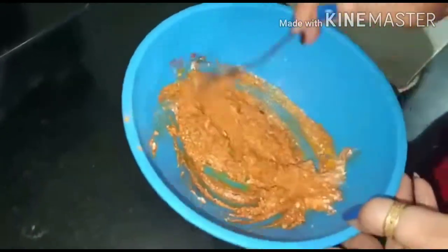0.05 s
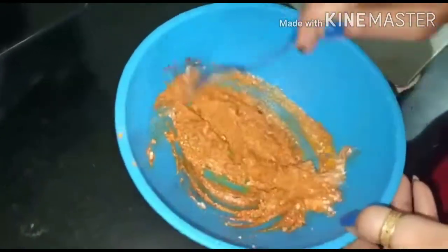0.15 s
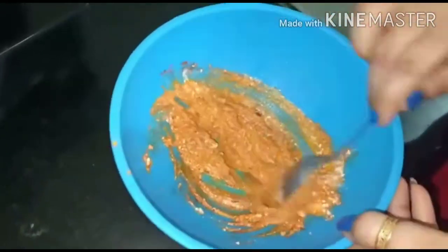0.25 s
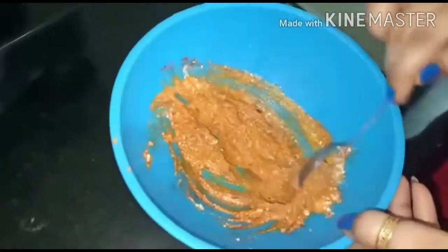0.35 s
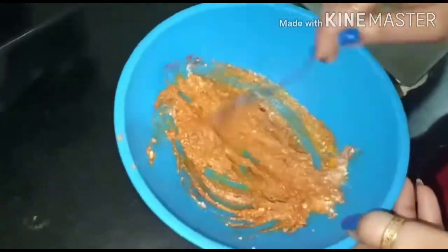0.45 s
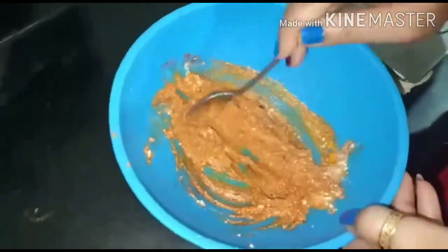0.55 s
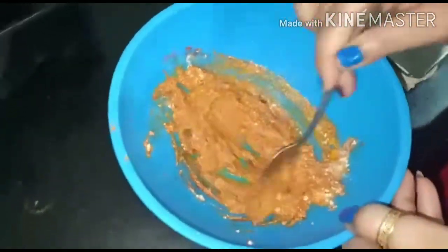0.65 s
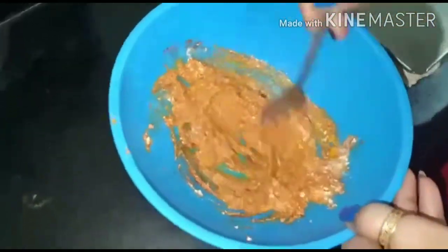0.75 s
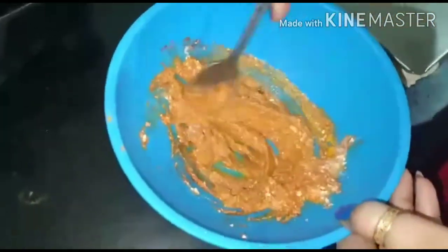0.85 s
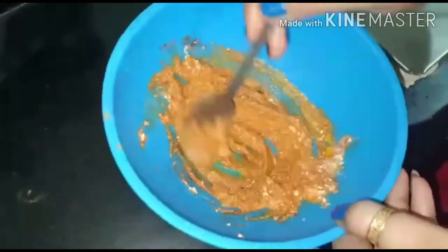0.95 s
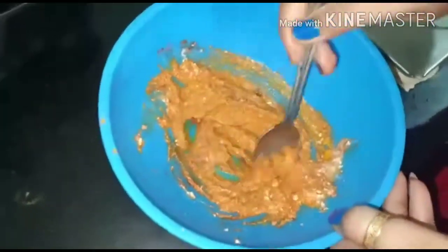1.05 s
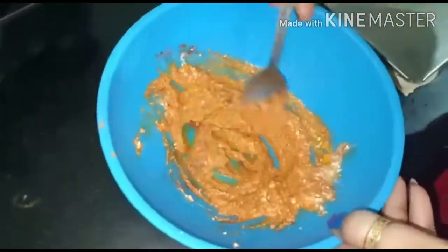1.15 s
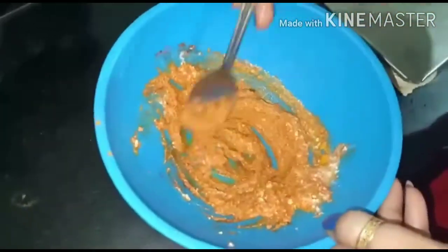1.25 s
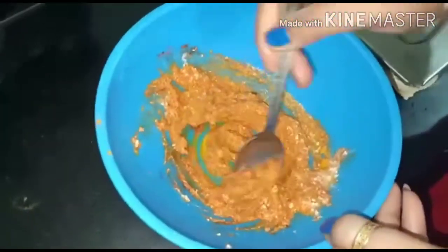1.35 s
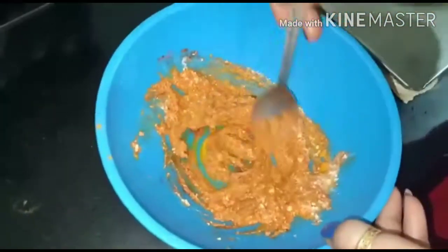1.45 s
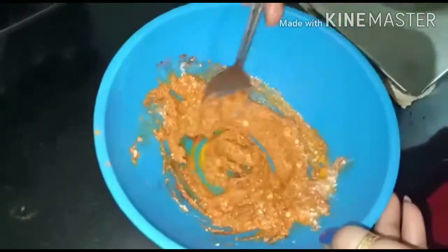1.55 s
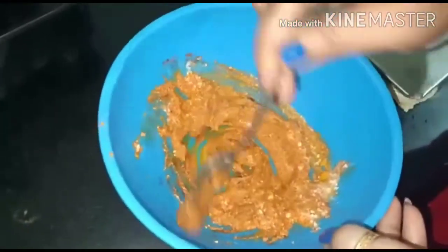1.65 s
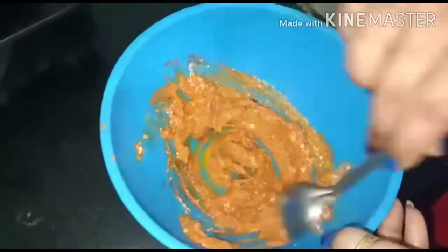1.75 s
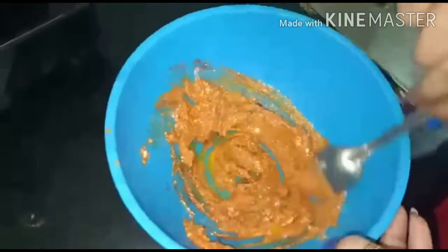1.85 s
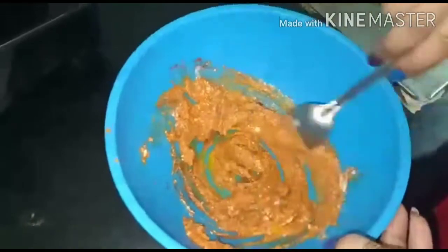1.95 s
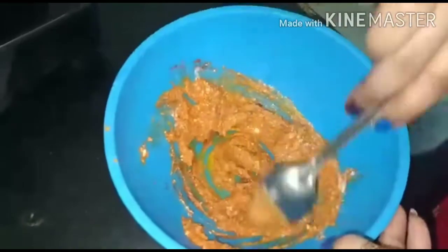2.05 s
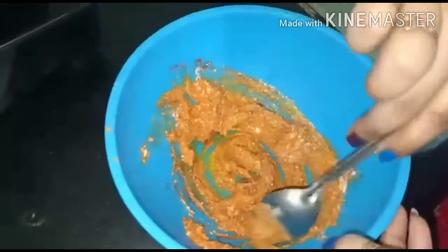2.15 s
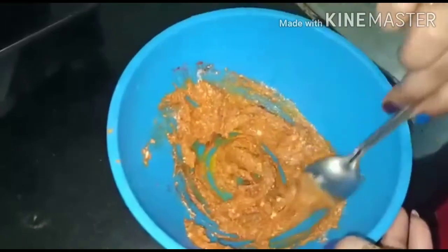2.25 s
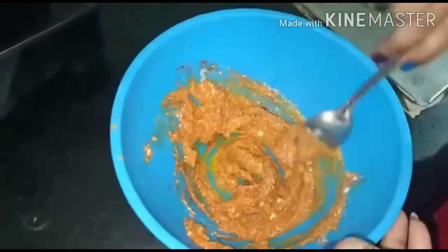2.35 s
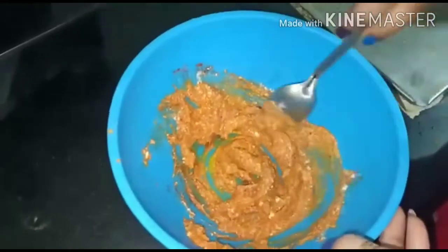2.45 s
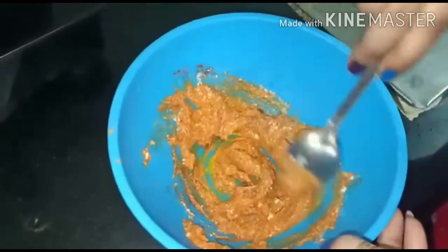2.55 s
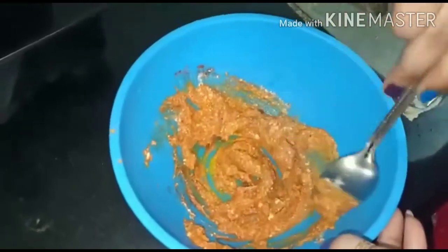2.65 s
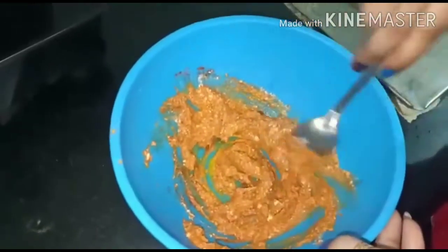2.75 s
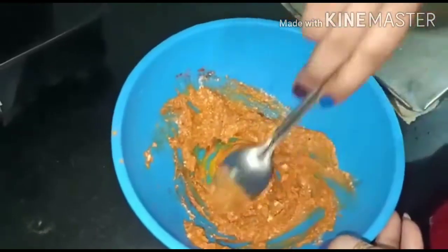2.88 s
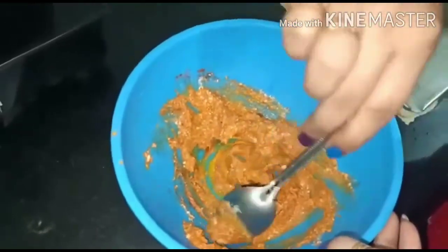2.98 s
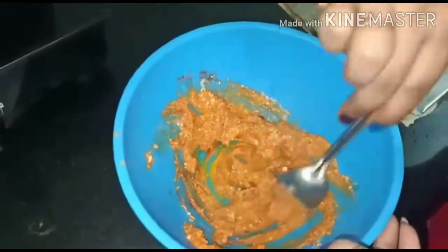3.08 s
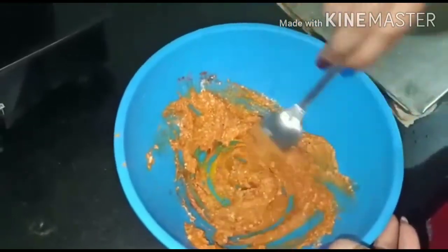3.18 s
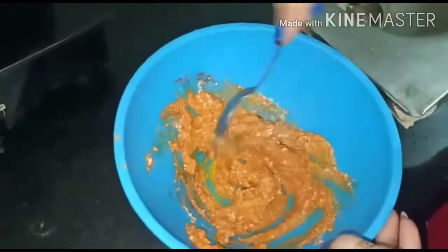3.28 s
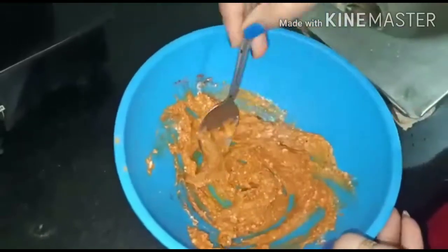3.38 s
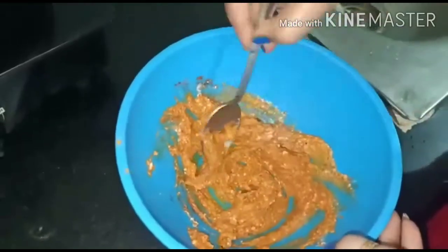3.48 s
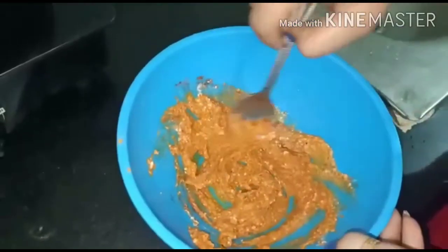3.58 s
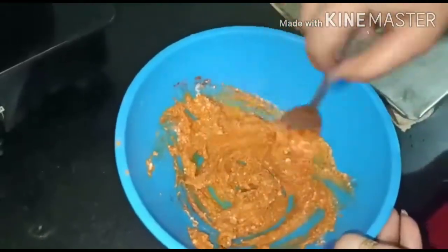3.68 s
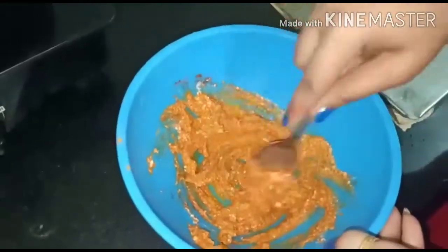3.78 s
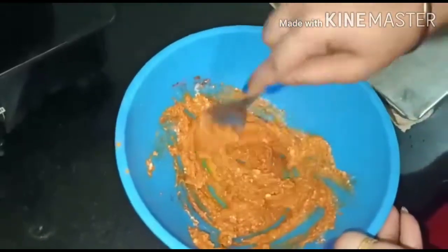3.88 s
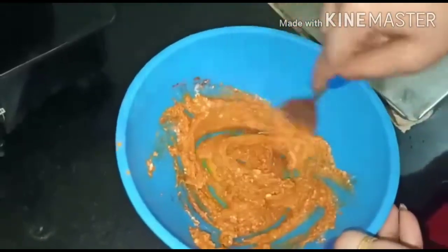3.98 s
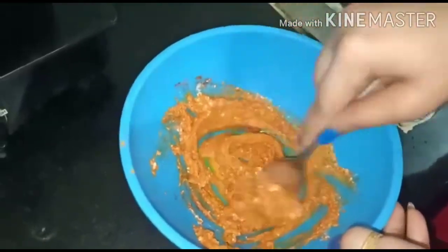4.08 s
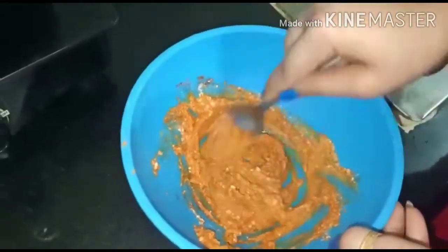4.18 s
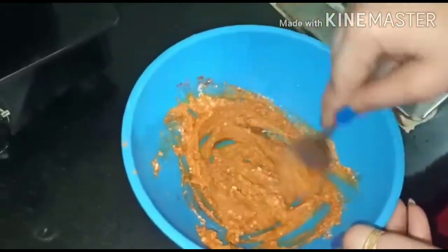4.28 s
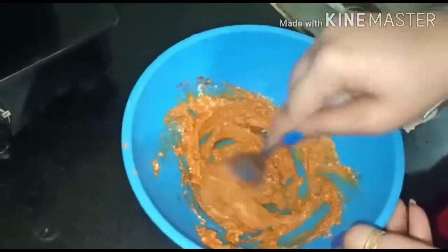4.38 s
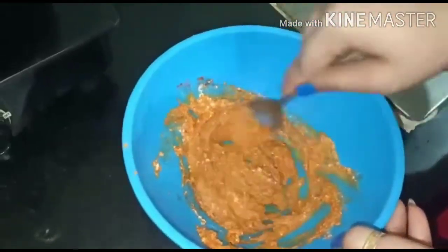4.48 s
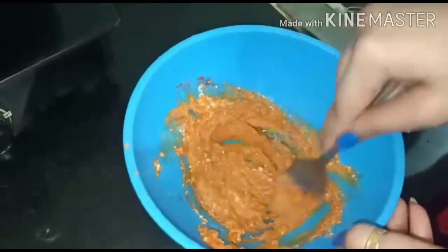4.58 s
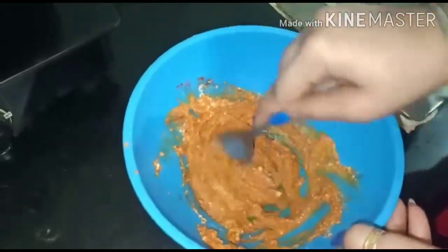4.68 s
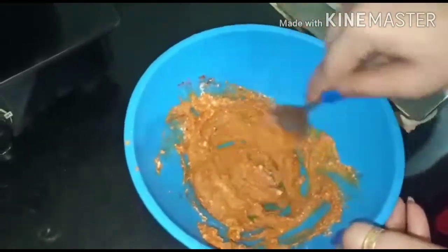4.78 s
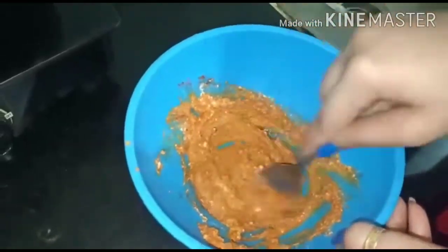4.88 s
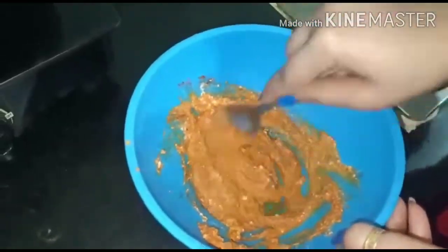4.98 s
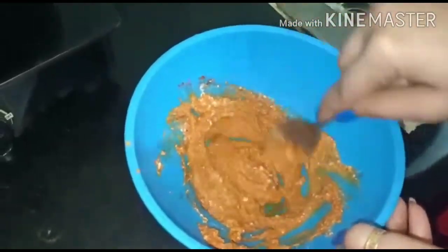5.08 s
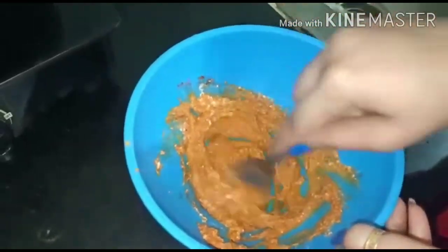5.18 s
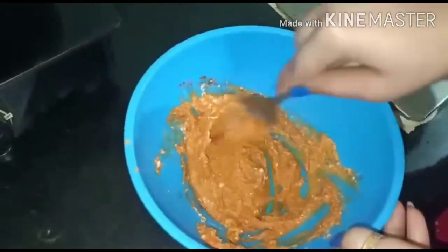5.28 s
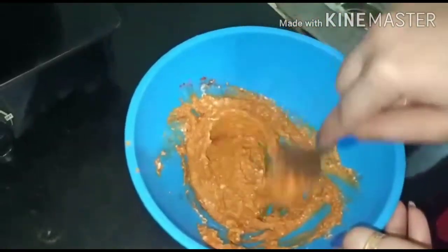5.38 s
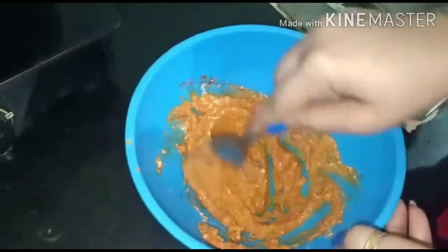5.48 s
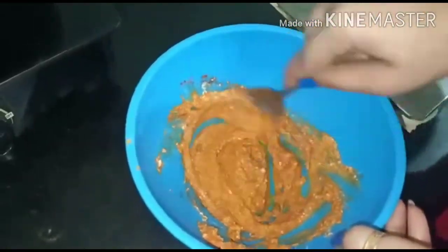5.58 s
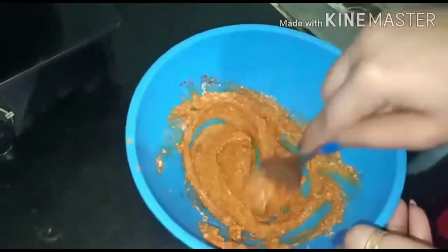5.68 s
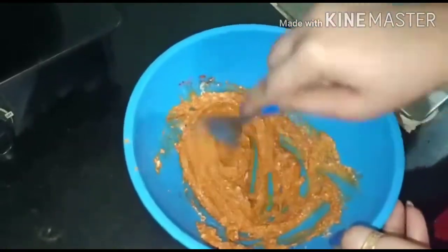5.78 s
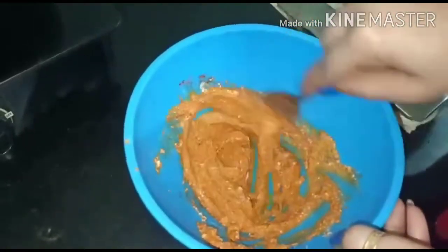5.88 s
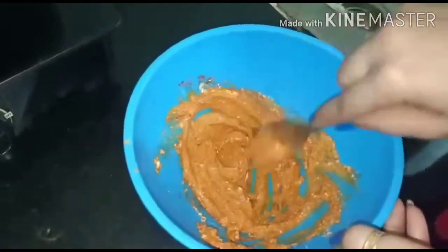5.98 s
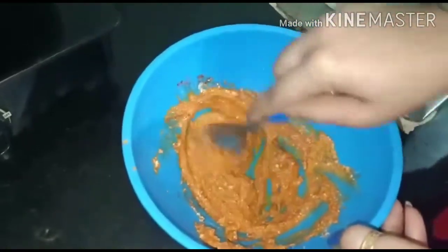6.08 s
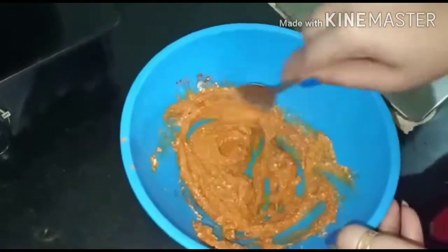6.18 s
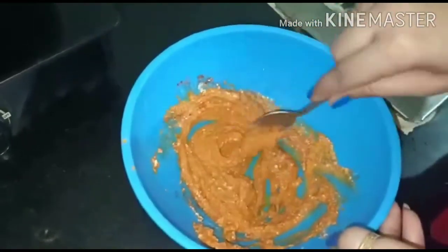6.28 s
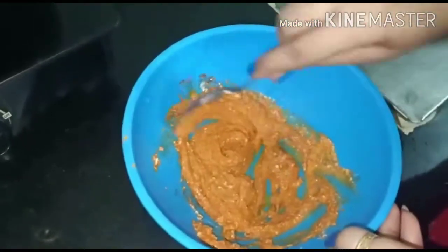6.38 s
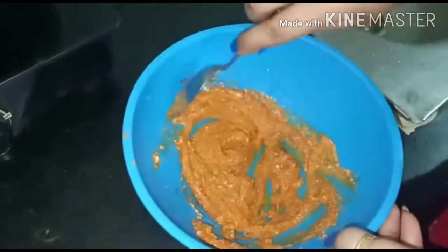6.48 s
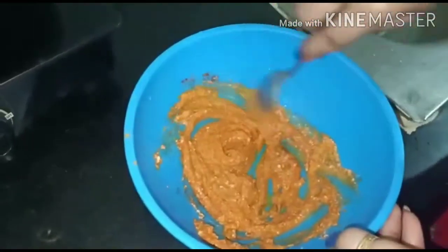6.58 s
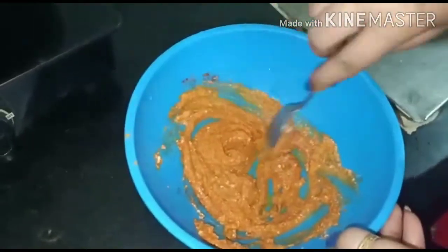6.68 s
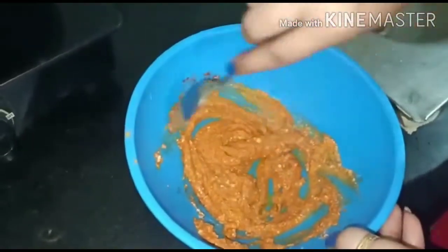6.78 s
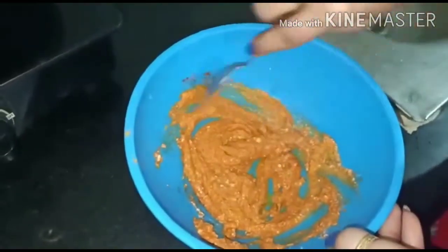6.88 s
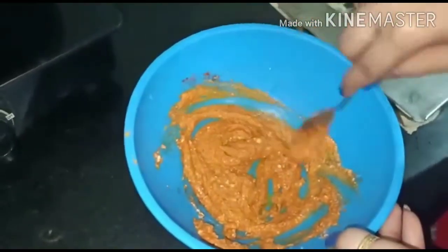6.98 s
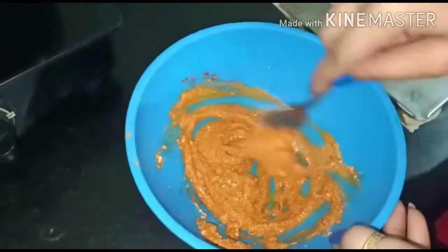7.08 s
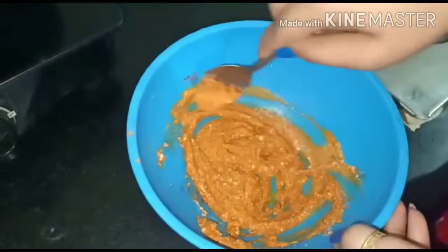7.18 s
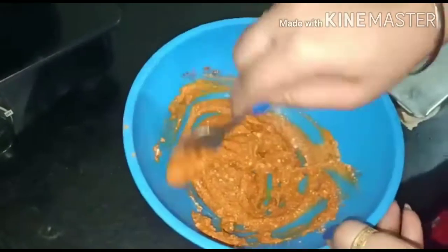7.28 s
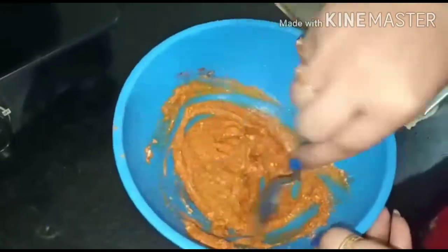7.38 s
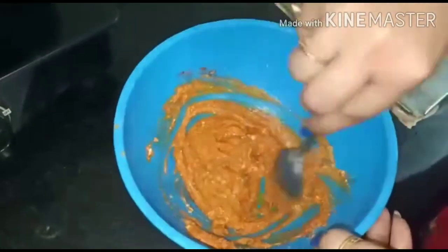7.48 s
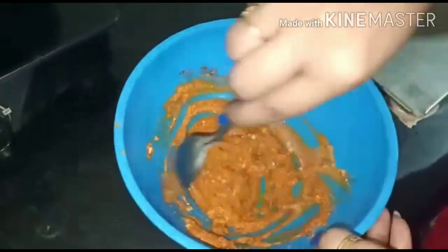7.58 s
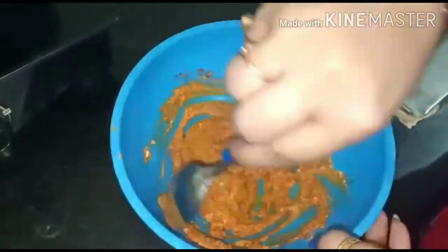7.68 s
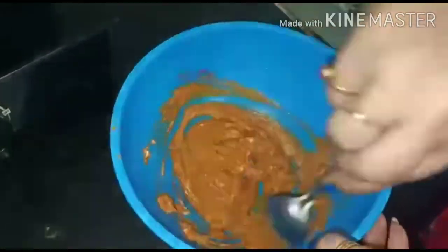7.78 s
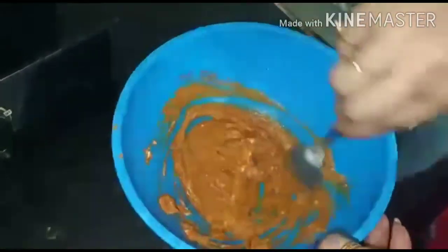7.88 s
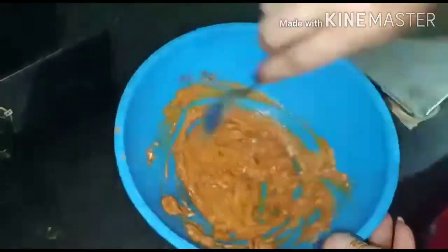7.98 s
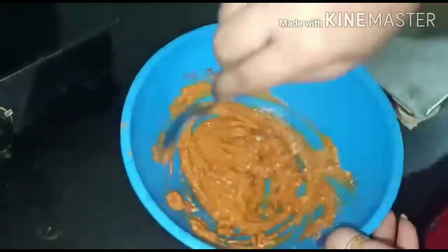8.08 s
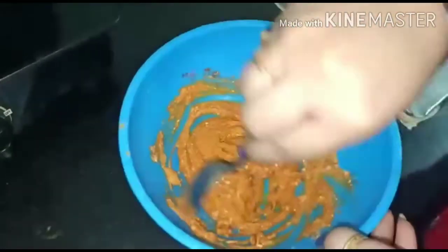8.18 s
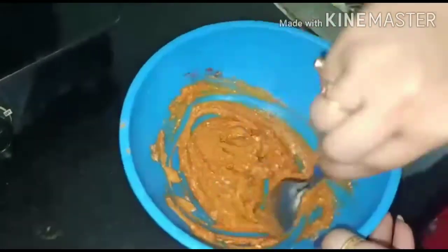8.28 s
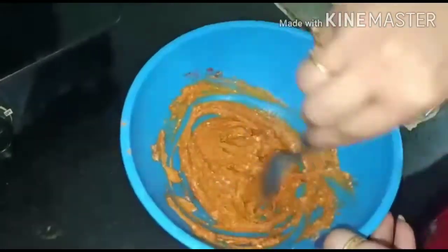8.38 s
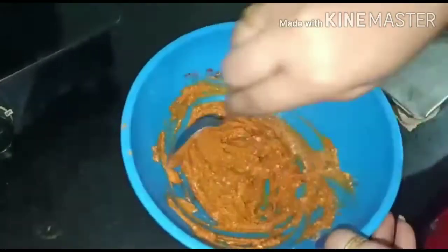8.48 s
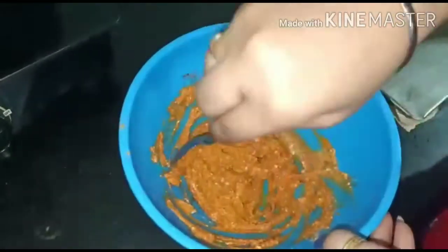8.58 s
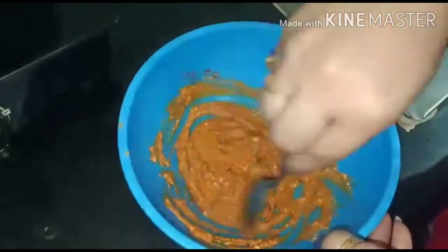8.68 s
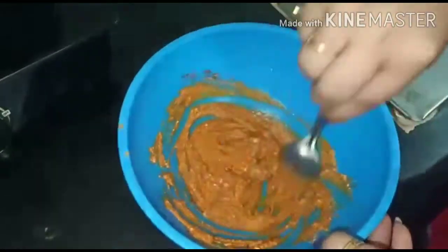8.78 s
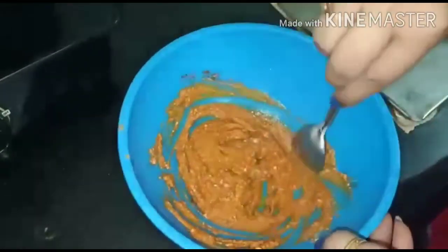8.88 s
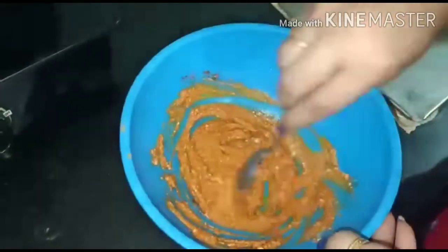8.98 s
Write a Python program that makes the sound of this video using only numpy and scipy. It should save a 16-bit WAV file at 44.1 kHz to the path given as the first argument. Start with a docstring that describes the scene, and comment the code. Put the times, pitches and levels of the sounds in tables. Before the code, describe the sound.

Close, dry plastic knocks from a metal spoon alternate with short gritty scrapes and small wet squelches. The strokes are irregular and brisk, busiest in the middle where the spoon circles without lifting. A bright scrape and snap follow just before seven seconds, then slower separate taps. Short kitchen reflections and a faint low room hush surround the bowl; the microphone is near and slightly dull in the highest treble.

```python
"""In a small hard-walled kitchen, a steel spoon beats a thick, gritty marinade in a hand-held plastic bowl.
Knocks ring damped bowl modes; tiny random slips ring the same modes as the spoon drags and scrapes.
The paste crackles, squelches and pops as its air pockets tear; a faint squeak sounds between two knocks.
The middle part is one continuous stir. Two microphone ports listen from close above,
over reflections, low standing waves and a quiet room floor made from shaped noise and decaying tones."""
import sys
import numpy as np
from scipy import signal
from scipy.io import wavfile

SR = 44100
rng = np.random.default_rng(int(sys.argv[2]) if len(sys.argv) > 2 else 0)


def wav_out(sig):
    """Save sig, one row per channel (or a flat mono array), as 16-bit PCM at SR to the path in sys.argv[1]."""
    wavfile.write(sys.argv[1], SR, np.round(np.clip(np.atleast_2d(sig).T, -1, 1) * 32767).astype(np.int16))


N = 398663

# All table levels are relative: the mix settings of each source come on top.
# spoon knocks, by what they set ringing: (time [s], hollow pitch [Hz], clack pitch [Hz],
# wall flex [dB], hollow [dB], clack [dB], tick [dB])
KNOCKS = [(.074, 583, 2400, -24.5, -13, -15.5, -31), (.299, 826, 1790, -26, -12.5, -13.5, -29),
          (0.3095, 826, 2300, -47, -36, -17.5, -34.5), (.534, 704, 2220, -27.5, -12.5, -18, -29.5),
          (0.7574, 713, 1460, -35, -21.5, -43, -46), (.8586, 684, 1860, -23.5, -10.5, -19, -37),
          (.976, 786, 2900, -55.5, -36, -29.5, -40), (.998, 807, 2600, -50.5, -31, -25, -49),
          (1.117, 892, 1900, -59, -35, -25, -47.5), (1.153, 914, 2300, -56.5, -22.5, -36, -39),
          (1.171, 850, 2550, -46.5, -34, -25, -47), (1.202, 617, 1690, -26, -11, -24.5, -34),
          (1.304, 746, 2600, -49, -26, -38, -63), (1.335, 806, 2650, -60, -22.5, -33, -63),
          (1.544, 560, 1480, -24.5, -20, -26, -40), (1.734, 744, 2600, -41.5, -23.5, -39, -59),
          (1.963, 723, 2910, -25.5, -13, -15, -27.5), (2.1823, 770, 2190, -35.5, -26, -19.5, -48),
          (2.198, 800, 1900, -53, -41.5, -35, -52), (2.26, 630, 2280, -38.5, -51.5, -37.5, -57),
          (2.514, 603, 2560, -31.5, -16.5, -19.5, -26), (2.631, 764, 2550, -41, -47, -29.5, -56),
          (2.655, 764, 1750, -40.5, -25.5, -31, -60), (2.842, 690, 2600, -23, -14.5, -24, -33),
          (2.919, 755, 2400, -34.5, -21.5, -41.5, -40), (2.9965, 807, 2700, -53.5, -24, -30, -45.5),
          (3.2643, 658, 2000, -22, -12.5, -11.5, -17), (3.599, 711, 2420, -37, -30, -36, -50),
          (3.621, 684, 1600, -42, -42, -27, -54), (3.698, 800, 2000, -40, -22, -33, -40),
          (3.739, 764, 2500, -36.5, -23, -22.5, -46), (3.867, 717, 2600, -59, -26, -22.5, -39),
          (3.906, 713, 2400, -53, -22.5, -21.5, -34), (3.914, 820, 2600, -58, -25, -21, -38),
          (3.947, 724, 2580, -34, -17, -17, -30), (4.031, 735, 2600, -48, -22, -24.5, -41),
          (4.041, 752, 2400, -60, -23, -23.5, -46), (4.149, 983, 2600, -50, -27, -40, -56),
          (4.174, 720, 2550, -31.5, -19, -36.5, -34.5), (4.231, 797, 2680, -34, -22, -25, -40),
          (4.401, 906, 2300, -62, -27.5, -36, -54), (4.454, 740, 2520, -30, -12, -16.5, -29.5),
          (4.515, 740, 2300, -40.5, -31, -29, -39), (4.557, 740, 1970, -43, -20, -44, -62),
          (4.735, 803, 2340, -35.5, -18, -21, -50), (4.845, 720, 2540, -37, -23.5, -28.5, -41),
          (5.029, 693, 2360, -36, -20, -34, -44), (5.086, 776, 2700, -36.5, -22.5, -26.5, -45),
          (5.186, 765, 1990, -47.5, -37.5, -29.5, -49.5), (5.215, 780, 2390, -54, -19.5, -32.5, -46.5),
          (5.267, 900, 2210, -52, -23, -29.5, -29), (5.274, 890, 2600, -58, -28, -28, -30),
          (5.296, 730, 2150, -30, -9.5, -14, -37), (5.383, 767, 2800, -47, -21.5, -26, -48),
          (5.398, 713, 2400, -32, -29, -33.5, -54), (5.49, 969, 2600, -57, -32, -19, -38),
          (5.602, 914, 1500, -33.5, -21, -30, -33), (5.66, 608, 2180, -41, -32, -55, -57),
          (5.788, 975, 1790, -34, -20.5, -20, -38), (5.855, 1000, 2450, -51, -23.5, -25.5, -39),
          (5.945, 848, 2420, -36, -25, -20, -32.5), (6.289, 723, 2590, -32, -22.5, -21, -33.5),
          (6.4695, 837, 1700, -46, -26, -30.5, -46), (6.475, 820, 1600, -56, -32, -30.5, -51),
          (6.657, 710, 2600, -28.5, -18.5, -14.5, -30.5), (6.802, 854, 2930, -60, -15, -18.5, -41),
          (6.826, 663, 2860, -54, -22, -17.5, -32), (7.078, 620, 2930, -25.5, -21, -18, -42),
          (7.533, 755, 2720, -31, -23, -20, -32.5), (7.989, 728, 2680, -35, -40, -28, -36),
          (8.151, 761, 2750, -66, -42, -37, -44), (8.411, 540, 2760, -21.5, -17.5, -20, -30),
          (8.528, 740, 2750, -58, -33.5, -24, -29.5), (8.889, 825, 1900, -31, -19.5, -24, -48),
          (8.9475, 854, 2200, -42, -26, -29, -45), (8.986, 770, 2820, -40, -46, -28.5, -46)]
# modes of the paste-damped bowl with the spoon against it: (frequency [Hz], level [dB], t60 [s])
BOWL = [(214, -8.5, 0.046), (264, -6, 0.048), (306.6, 0.5, 0.028), (364, 0, 0.028), (450, -4, 0.024),
        (546, -1, 0.028), (602, 1.5, 0.015), (703, -1, 0.024), (740, 0.5, 0.032), (826, -3.5, 0.023),
        (928, -0.5, 0.028), (1090, -3, 0.0089), (1326, 0, 0.0094), (1600, 2, 0.0075), (1768, -0.5, 0.0048),
        (1900, -4.5, 0.012), (2162, -4, 0.0076), (2401, -5, 0.026), (2600, 0.5, 0.014), (2930, 1, 0.0095),
        (3380, -2.5, 0.011), (3800, -5, 0.0088), (4200.4, 7.5, 0.004), (4700, 4, 0.0048),
        (5200, -6, 0.0021), (6040, 2.5, 0.0063), (6760, 2.5, 0.0095), (7000, 3, 0.0054)]
# edges of the four mode families flex, hollow, clack and tick: (frequency [Hz])
FAMILY_HZ = [150, 560, 1200, 4200, 9000]
# strokes of the spoon through the paste: (time [s], length [s], drag on the bottom [dB],
# scrape on the wall [dB], wet crackle [dB], wall pitch [Hz])
STROKES = [(0, 0.012, -37, -39.5, -56, 2600), (0.084, 0.021, -53, -29, -39, 2220),
           (0.521, 0.0083, -47, -27, -41, 2400), (0.632, 0.081, -39.5, -29, -41, 2370),
           (0.937, 0.095, -41.5, -36, -48, 2500), (1.064, 0.035, -45, -33.5, -47, 2490),
           (1.101, 0.054, -42, -29, -43.5, 2470), (1.297, 0.13, -43, -36.5, -51, 2470),
           (1.587, 0.043, -36, -34.5, -41, 2540), (1.694, 0.044, -34.5, -30, -42.5, 2700),
           (2.022, 0.19, -43, -39.5, -49, 2560), (2.17, 0.045, -41, -28, -48, 2470),
           (2.236, 0.014, -48, -37, -50, 2380), (2.559, 0.043, -43, -32.5, -47, 2480),
           (2.893, 0.11, -34.5, -31, -46.5, 2670), (3.288, 0.056, -30, -32.5, -46, 2400),
           (3.378, 0.11, -43, -41.5, -53.5, 2220), (3.598, 0.13, -39.5, -29, -41, 2350),
           (3.855, 0.078, -57, -42, -43, 2400), (4, 0.039, -38, -29, -41, 2403),
           (4.08, 0.062, -39.5, -36, -43.5, 2530), (4.186, 0.1, -37.5, -32, -44, 2600),
           (4.394, 0.028, -41, -30, -41.5, 2600), (4.465, 0.11, -40, -35, -47.5, 2350),
           (4.678, 0.073, -35, -30, -36.5, 2870), (4.785, 0.032, -39.5, -35.5, -41.5, 2600),
           (4.945, 0.032, -42, -35, -43, 2470), (4.979, 0.03, -32, -27, -35.5, 2470),
           (5.032, 0.11, -35, -31.5, -43, 2500), (5.229, 0.034, -38, -23, -45, 2280),
           (5.377, 0.05, -37, -31.5, -42.5, 2520), (5.523, 0.029, -33, -25, -31.5, 2300),
           (5.591, 0.082, -32, -36.5, -55, 2210), (5.678, 0.035, -56, -35, -41.5, 2360),
           (5.968, 0.06, -39.5, -35, -42.5, 2400), (6.404, 0.048, -54, -41.5, -50.5, 2750),
           (6.444, 0.017, -34, -28.5, -42.5, 2380), (6.727, 0.084, -40.5, -38, -42, 2820),
           (6.786, 0.042, -33, -21, -32, 2820), (7.103, 0.046, -52, -33.5, -43, 2640),
           (7.153, 0.037, -36, -25.5, -34, 2730), (7.194, 0.015, -30, -18.5, -29, 2670),
           (7.289, 0.048, -38, -34.5, -45.5, 2720), (7.614, 0.11, -56, -43.5, -49, 2680),
           (7.72, 0.032, -37, -32.5, -44.5, 2660), (7.983, 0.065, -38.5, -33, -43.5, 2760),
           (8.088, 0.093, -50.5, -41, -44.5, 2690), (8.489, 0.064, -35.5, -31, -35.5, 2780),
           (8.926, 0.076, -38, -34.5, -47, 2290)]
# the spoon circles without leaving the paste: (drag [dB], scrape [dB], crackle [dB])
CIRCLING_DB = [-44, -42.5, -52]
CIRCLING_FROM_S, CIRCLING_TO_S = 3.6, 5.75
# every stroke bites, swells and lets go; the crackle swells most, as the spoon pulls out of the paste:
# swell from start to end (drag [dB], scrape [dB], crackle [dB])
BITE_S, SWELL_DB, LET_GO_S = 0.0076, [-0.5, 0.5, 1.5], 0.013
# after each knock the spoon skids on and slows:
# (drag against hollow [dB], scrape against clack [dB], crackle against tick [dB])
SKID_DB, SKID_ONSET_S, SKID_FADE_S = [-19, -26, -15.5], 0.015, 0.069
# how bare of paste the wall is under the spoon; bare plastic rings more narrowly: (time [s], share [0-1])
BARE = [(0, 0.06), (2.2, 0.51), (2.8, 0.64), (3.5, 0.22), (5.8, 0.07), (6.72, 0.97), (8.6, 1), (8.8, 0.44)]
# air gaps that open or close under the spoon:
# (time [s], length [s], first pitch [Hz], last pitch [Hz], level [dB])
SQUELCHES = [(0.634, 0.11, 2050, 2000, -35), (0.643, 0.045, 3720, 3020, -39.5),
             (1.007, 0.088, 1520, 1320, -44), (1.103, 0.057, 810, 1040, -27),
             (1.316, 0.034, 1030, 1340, -45), (2.18, 0.042, 1860, 1570, -30.5),
             (2.183, 0.038, 3000, 2760, -30), (2.626, 0.047, 2600, 1900, -37.5),
             (2.884, 0.13, 5750, 6400, -33.5), (3.657, 0.076, 1730, 1220, -32.5),
             (3.858, 0.034, 2700, 4400, -33), (3.875, 0.064, 6800, 7400, -35.5),
             (4.03, 0.029, 3020, 3920, -41), (4.1, 0.052, 1370, 1050, -39), (4.131, 0.033, 3180, 3800, -35),
             (4.345, 0.046, 1900, 3940, -38.5), (4.64, 0.042, 2880, 3430, -32),
             (4.688, 0.022, 3500, 6340, -31), (4.784, 0.02, 3540, 3840, -34),
             (4.911, 0.077, 1290, 1600, -35.5), (4.97, 0.037, 7000, 5470, -32.5),
             (4.975, 0.11, 4700, 3060, -31.5), (5.243, 0.014, 7100, 6760, -29.5),
             (5.263, 0.011, 6500, 5200, -28.5), (5.533, 0.092, 4340, 3500, -33),
             (5.535, 0.072, 7000, 6150, -37), (5.63, 0.018, 1090, 706, -42),
             (5.652, 0.034, 620, 402, -31.5), (5.692, 0.039, 5330, 6330, -46),
             (6.8, 0.012, 2800, 3040, -10.5), (7.634, 0.076, 6900, 6440, -46),
             (7.149, 0.055, 2800, 3280, -29), (8.096, 0.11, 3270, 2600, -36),
             (8.503, 0.094, 3140, 2630, -29), (8.798, 0.11, 1750, 1600, -50),
             (8.815, 0.09, 1250, 1100, -48)]
# lone air pockets that burst in the paste: (time [s], pitch [Hz], level [dB])
POPS = [(.463, 6170, -30.5), (1.869, 6240, -42), (2.709, 6450, -24.5), (2.9725, 4960, -21),
        (2.985, 5800, -10.5), (4.429, 6500, -19), (6.119, 5970, -35.5), (7.172, 3500, -18),
        (7.712, 3550, -22), (8.507, 5500, -21), (8.872, 4800, -22.5)]
# loudness of the faint two-tone squeak: (time [s], level [dB])
SQUEAK = [(6.11, -88), (6.16, -55), (6.21, -59), (6.25, -95)]
# its two tones: (frequency [Hz], level [dB])
SQUEAK_LINES = [(517, 0), (1535, -5)]
# how much louder the left port hears each pitch of the bowl: (frequency [Hz], level difference [dB])
LEANING = [(200, -2.5), (350, 2.5), (430, -1), (530, 5.5), (610, 0.5), (740, 1), (826, -11.5), (933, 2),
           (1150, -5), (1500, -4.5), (2000, -0.5), (2700, -1), (4500, -5), (7000, -1)]
# low standing waves of the kitchen: (frequency [Hz], level [dB], t60 [s])
BOOM = [(78.6, -57.5, .6), (119, -60.5, 0.32), (140, -46, 0.43), (170, -52, 0.25), (200.6, -58, 0.3)]
# decay of the kitchen's reverberation: (frequency [Hz], t60 [s])
ROOM_T60 = [(100, 0.5), (260, 0.6), (700, 0.35), (1800, 0.36), (3000, 0.36), (6000, 0.28), (14000, 0)]
# its strength against the direct sound: (frequency [Hz], level [dB])
ROOM_DB = [(100, -10), (300, -1), (700, -1), (1500, -0.5), (3000, -3.5), (6000, -6.5), (14000, 10.5)]
# left-right likeness of diffuse sound: (frequency [Hz], correlation [-1 to 1])
LIKENESS = [(100, 0.75), (270, 1), (480, 0.35), (680, 0.83), (850, 0.27), (1200, -0.45), (1700, 0.05),
            (16000, 0.61)]
# spectrum of the quiet room: (frequency [Hz], density [dB per Hz])
FLOOR = [(25, -27.5), (50, -16.5), (75, -1), (140, -1), (300, -11), (700, -10.5), (1300, -14), (2700, -14),
         (5000, -24.5), (8000, -20.5), (16000, -27.5)]
FLOOR_DB = -62
CUTOFF_HZ = 15900


def knocks(thud_db=5.0, thump_db=20.5, thump_hz=300, flex_db=23.5, hollow_db=19.5, clack_db=21.5,
           tick_db=22.0, flex_hz=370, tick_hz=5000, focus_db=9.0, crack_db=23.5, crack_s=0.0015,
           snap_db=13.5, punch_db=16.0, contact_s=0.001205):
    """Steel on plastic rings four mode families, with a crack, a snap, a woody punch, a thump and a thud."""
    out = np.zeros((2, N + SR))
    t = np.arange(SR // 12) / SR
    push = thud()
    for s, hollow_hz, clack_hz, flex, hollow, clack, tick in KNOCKS:
        gains = from_db([flex + flex_db, hollow + hollow_db, clack + clack_db, tick + tick_db])
        pitches = [flex_hz, hollow_hz, clack_hz, tick_hz]
        hit = sum(gains[k] * bowl_ring(k, hz, focus_db) for k, hz in enumerate(pitches))
        crack = rng.standard_normal((2, len(t))) * np.exp(-t / crack_s)
        hit += from_db(tick + crack_db) * unit_energy(butter(crack, [2500, 6500], "band"))
        hit += from_db(hollow + punch_db) * punch(hollow_hz, cycles=0.96, lag_rad=.6)
        hit += from_db(clack + snap_db) * punch(clack_hz, cycles=0.89, lag_rad=1.14)
        hit += from_db(flex + thump_db) * punch(thump_hz, cycles=0.66, lag_rad=0.18)
        hit += from_db(flex + thud_db) * push
        start = int((s + contact_s) * SR)    # contact comes just after the listed time
        out[:, start:start + len(t)] += hit
    return out[:, :N]


def bowl_ring(family, focus_hz, focus_db, detune=0.028, spread_db=1.0, apart_hz=700, widest=1.59,
              phase_spread=0.44, build_cycles=0.76):
    """One contact rings a mode family; the spot favours modes near focus_hz and sets their port phases."""
    t = np.arange(SR // 12) / SR
    out = np.zeros((2, len(t)))
    for mode_hz, level_db, t60 in BOWL:
        if FAMILY_HZ[family] <= mode_hz < FAMILY_HZ[family + 1]:
            chance = rng.standard_normal((4, 1))
            hz = mode_hz * (1 + detune * rng.standard_normal())    # the shifting load of paste retunes it
            apart = min((hz / apart_hz) ** 2, widest) * (phase_spread * chance[1] - 1)
            phase = np.pi * chance[0] + apart * np.array([[.5], [-.5]])
            swell = 1 - np.exp(-t * hz / build_cycles)    # bending waves arrive later the lower they are
            strength_db = level_db - focus_db * abs(np.log2(hz / focus_hz)) + spread_db * chance[2:]
            decay = from_db(strength_db - 60 * t / t60)
            out += ports(at_hz(LEANING, mode_hz)) * decay * swell * np.sin(2 * np.pi * hz * t + phase)
    return unit_energy(butter(out, FAMILY_HZ[family] * 0.67, "high"))


def punch(hz, cycles, lag_rad, low_hz=180):
    """The wall dents and springs back in a few quick swings, which reach the left port a little later."""
    t = np.arange(SR // 12) / SR
    phase = lag_rad * np.array([[1], [0]])
    swing = t * np.exp(-t * hz / cycles) * np.sin(2 * np.pi * hz * t - phase)
    return unit_energy(butter(swing, low_hz, "high"))


def thud(low_hz=120, high_hz=200):
    """The whole bowl is pushed against the counter; both ports hear the same."""
    pulse = butter(signal.unit_impulse(SR // 12), [low_hz, high_hz], "band")
    return unit_energy(np.array([pulse, pulse]))


def stirring(thud_db=-26.5, flex_db=-17.0, drag_db=-2.0, scrape_db=-3.5, wet_db=-2.0, judder_db=3.2,
             lumps_db=0.98, flex_hz=400):
    """Catching on grains and lumps, the spoon judders in drag, scrape and crackle alike: (bowl, paste)."""
    t = np.arange(N) / SR
    judder = from_db(judder_db * drift(rate=200) + lumps_db * drift(rate=61))
    drag, scrape, wet = rubbing_forces() * judder

    dragging = drag * slips(per_s=1000, uneven_db=2.5)
    bottom = from_db(flex_db) * rubbed(dragging, family=0, focus_hz=flex_hz, focus_db=19.5)
    hollow_hz = np.interp(t, *np.transpose(KNOCKS)[:2])    # moves from one knock's spot to the next
    hollow = rubbed(dragging, family=1, focus_hz=hollow_hz, focus_db=6.0, wander=.3, scatter=.25)
    bottom += from_db(drag_db) * hollow

    scraping = from_db(scrape_db) * scrape * slips(per_s=1500, uneven_db=5.0)
    s, length, *_, wall_hz = np.transpose(STROKES)
    place_hz = np.interp(t, s + length / 2, wall_hz)    # travels from one stroke's spot to the next
    bare_share = np.interp(t, *np.transpose(BARE))
    on_plastic = rng.random(N) < bare_share    # each slip lands on bare wall or on paste
    wall = rubbed(scraping * on_plastic, family=2, focus_hz=place_hz, focus_db=25.0,
                  wander=0.048, scatter=0.073)
    wall += rubbed(scraping * ~on_plastic, family=2, focus_hz=place_hz, focus_db=12.5,
                   wander=0.45, scatter=.14)

    paste = from_db(wet_db) * crackle(wet * slips(per_s=2600, uneven_db=2.0))
    return from_db(thud_db) * through(dragging, thud()) + retuned(bottom + wall), paste


def rubbing_forces():
    """Strength of drag, scrape and crackle, from the strokes, the circling and the skid after each knock."""
    power = np.zeros((3, N))
    for s, length, drag, scrape, wet, _ in STROKES:
        add(power, s, [drag, scrape, wet], stroke(length, SWELL_DB))
    add(power, CIRCLING_FROM_S, CIRCLING_DB, stroke(CIRCLING_TO_S - CIRCLING_FROM_S, [0]))
    t = np.arange(SR // 2) / SR
    skid = np.minimum(t / SKID_ONSET_S, 1) * np.exp(-t / SKID_FADE_S)
    for s, *_, hollow, clack, tick in KNOCKS:
        add(power, s, np.add([hollow, clack, tick], SKID_DB), skid)
    return np.sqrt(power)


def stroke(length, swell_db):
    """Shape of the force in one stroke: bite, swell, release."""
    t = np.arange(int(length * SR) + SR // 4) / SR
    swell = from_db(np.outer(swell_db, np.minimum(t / length, 1) - .5))
    release = np.exp(-np.maximum(t - length, 0) / LET_GO_S)
    return np.minimum(t / BITE_S, 1) * swell * release


def add(power, s, levels_db, shape):
    """Lay one movement of the spoon into the powers of drag, scrape and crackle."""
    start = max(int(s * SR), 0)
    part = (from_db(levels_db)[:, None] * shape)[:, :N - start]
    power[:, start:start + part.shape[1]] += part ** 2


def slips(per_s, uneven_db):
    """Random tiny releases of force with uneven sizes; rms 1."""
    sizes = from_db(uneven_db * np.minimum(rng.exponential(1, N), 4)) * rng.choice([-1, 1], N)
    return rms_one(sizes * (rng.random(N) < per_s / SR))


def rubbed(force, family, focus_hz, focus_db, wander=.18, scatter=.15, count=6):
    """Slips ring one mode family from spots around the spoon's place (wander and scatter in octaves)."""
    spots = np.geomspace(FAMILY_HZ[family], FAMILY_HZ[family + 1], count)
    octave = np.log2(focus_hz / spots[0]) + wander * drift(rate=25) + scatter * rng.standard_normal(N)
    spot = np.clip(np.round(octave / np.log2(spots[1] / spots[0])), 0, count - 1)
    return sum(through(force * (spot == k), bowl_ring(family, hz, focus_db)) for k, hz in enumerate(spots))


def retuned(x, shift_s=0.0022):
    """Paste and spoon load the wall differently from moment to moment, so its resonances slide a little."""
    samples = np.arange(N)
    read_at = samples + shift_s * SR * drift(rate=12)
    return np.array([np.interp(read_at, samples, channel) for channel in x])


def crackle(force, low_hz=3500, high_hz=7600, cycles=2.8, snap=0.12, clump_db=2.5, count=8):
    """Small air pockets tear open with a snap and ring for a few cycles; those of one size come in clumps."""
    t = np.arange(256) / SR
    pocket = rng.integers(0, count, N)
    out = 0
    for k, hz in enumerate(np.geomspace(low_hz, high_hz, count)):
        pop = np.exp(-t * hz / cycles) * np.sin(2 * np.pi * (hz * t + rng.random((2, 1))))
        pop[:, 0] += snap
        tearing = force * (pocket == k) * from_db(clump_db * drift(rate=64))
        out = out + through(tearing, unit_energy(pop))
    return out


def squelches(level_db=-3.0, ring_cycles=2.2):
    """Tearing paste rings an air gap whose pitch glides with its size, a quarter cycle apart at the ports."""
    out = np.zeros((2, N + SR))
    tearing = slips(per_s=1100, uneven_db=1.5)
    for s, length, first_hz, last_hz, db in SQUELCHES:
        start, size = int(s * SR), int(length * SR)
        turn = np.exp(2j * np.pi * np.cumsum(np.geomspace(first_hz, last_hz, size)) / SR)
        keep = np.exp(-2 * first_hz / (ring_cycles * SR))
        # a resonator that follows the glide: unwind the turning, smooth, wind it up again
        unwound = tearing[start:start + size] / turn
        ring = turn * signal.lfilter([1], [1, -2 * keep, keep ** 2], unwound)
        gap = rms_one(np.array([ring.imag, ring.real])) * signal.windows.tukey(size, .5)
        out[:, start:start + size] += from_db(db + level_db) * gap
    return out[:, :N]


def pops(level_db=0.0, cycles=1.6, low_hz=2200):
    """A large air pocket bursts with one short, bright snap."""
    out = np.zeros(N + SR)
    t = np.arange(256) / SR
    for s, hz, db in POPS:
        start = int(s * SR)
        burst = np.exp(-t * hz / cycles) * np.sin(2 * np.pi * hz * t)
        out[start:start + len(t)] += from_db(db + level_db) * burst
    return butter(out[:N], low_hz, "high")


def squeak(waver=0.0102):
    """A faint squeak of two sines that waver together in pitch."""
    level_db = np.interp(np.arange(N) / SR, *np.transpose(SQUEAK), left=-np.inf, right=-np.inf)
    clock = np.cumsum(1 + waver * drift(rate=35)) / SR
    tones = sum(from_db(db) * np.sin(2 * np.pi * hz * clock) for hz, db in SQUEAK_LINES)
    return from_db(level_db) * tones


def kitchen(x, count=3):
    """Hand and bowl keep moving, so reflections blend between spots; the low standing waves stay put."""
    shares = np.array([drift(rate=5) for _ in range(count)])
    shares /= np.linalg.norm(shares, axis=0)
    reflected = sum(through(x * share, reflections()) for share in shares)
    t = np.arange(SR * 3 // 4) / SR
    boom = sum(from_db(level_db - 60 * t / t60) * np.sin(2 * np.pi * hz * t) for hz, level_db, t60 in BOOM)
    return reflected + through(x.mean(axis=0), boom[None])


def reflections(near_db=-4.0, near_t60=0.032, gap_s=0.0021):
    """One spot's answer: quick reflections from counter and cook, and a tail that dies sooner in the treble."""
    t = np.arange(SR // 2) / SR

    def fade(level_db, t60):
        """Exponential decay whose total energy sets the level."""
        height = np.sqrt(2 * np.log(1000) / (t60 * SR))
        return from_db(level_db - 60 * t / t60) * height * (t > gap_s)

    response = 0
    for hz, band in diffuse_bands(len(t)):
        tail = fade(at_hz(ROOM_DB, hz), at_hz(ROOM_T60, hz)) * band[:, ::-1]    # noise run backwards
        near = fade(near_db, near_t60) * band
        response = response + tail + near
    return response


def room_floor(count=4):
    """Faint steady background of the house: shaped noise, a stretch of a few seconds repeated."""
    bands = diffuse_bands(N // count + 1)
    hush = rms_one(sum(from_db(at_hz(FLOOR, hz)) * band for hz, band in bands))
    return from_db(FLOOR_DB) * np.tile(hush, count)[:, :N]


def diffuse_bands(size):
    """Half-octave bands of diffuse stereo noise that add up to about white: (Hz, band)."""
    edges = 22 * 2 ** np.arange(0, 10, .5)
    white = rng.standard_normal((2, 2, size))
    for k, (low, high) in enumerate(zip(edges, edges[1:])):
        mid, side = butter(white[k % 2], [low, high], "band")    # neighbours use separate noise
        hz = np.sqrt(low * high)
        alike = np.clip(at_hz(LIKENESS, hz), -1, 1)
        yield hz, np.sqrt((1 + alike) / 2) * mid + np.sqrt((1 - alike) / 2) * side * [[1], [-1]]


def drift(rate):
    """Smooth chance of rms 1 that changes about rate times a second."""
    return rms_one(np.interp(np.arange(N) / SR * rate, np.arange(8192), rng.standard_normal(8192)))


def from_db(db):
    """Amplitude factor of a level in dB."""
    return 10 ** (np.asarray(db) / 20)


def rms_one(x):
    """Scale a signal to rms 1."""
    return x / np.sqrt(np.mean(x ** 2) + 1e-20)


def unit_energy(x):
    """Scale a stereo response to a mean energy of 1 per channel."""
    return x / np.sqrt(np.sum(x ** 2) / 2 + 1e-20)


def at_hz(points, hz):
    """Read a table on a log-frequency axis."""
    table = np.array(points)
    return np.interp(np.log(hz), np.log(table[:, 0]), table[:, 1])


def butter(x, hz, kind, order=2):
    """Butterworth filter."""
    return signal.sosfilt(signal.butter(order, hz, kind, fs=SR, output="sos"), x)


def through(x, response):
    """Play a signal through a response by convolution."""
    return signal.oaconvolve(np.atleast_2d(x), response, axes=1)[:, :N]


def ports(left_db):
    """Gains of the left and right port for a level difference."""
    return from_db(left_db * np.array([[.5], [-.5]]))


def scene(paste_pan_db=-2.5):
    """Bowl, paste and squeak in the kitchen; the paste lies slightly to the right of the ports."""
    rubbing, wet = stirring()
    paste = (wet + squelches() + pops()) * ports(paste_pan_db)
    direct = knocks() + rubbing + paste + squeak()
    return direct + kitchen(direct) + room_floor()


def record(dry, shelf_hz=7350, top_db=-16.5):
    """The microphone's top octave lies far down behind a steep shelf; the highest peaks are rounded."""
    below = butter(dry, shelf_hz, "low", order=12)
    above = from_db(top_db) * butter(dry, shelf_hz, "high", order=4)
    rounded = np.tanh(below + above)
    return signal.sosfilt(signal.ellip(10, .2, 80, CUTOFF_HZ, fs=SR, output="sos"), rounded)


dry = scene()
out = record(dry)
wav_out(out)
```